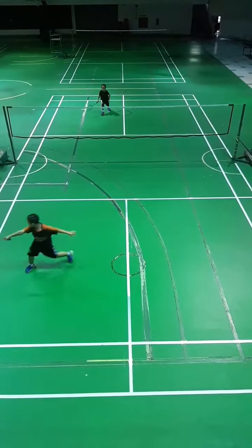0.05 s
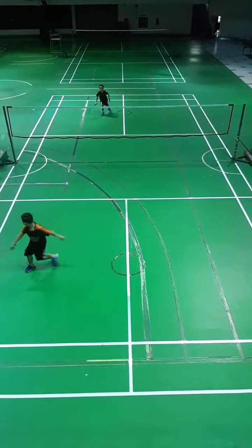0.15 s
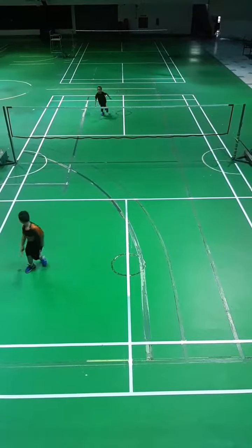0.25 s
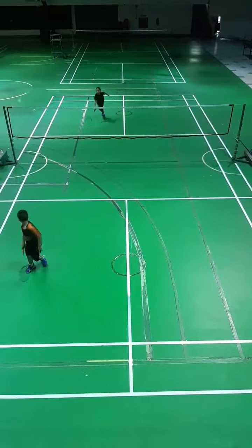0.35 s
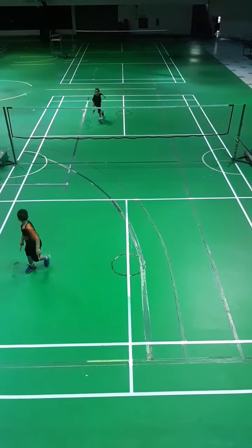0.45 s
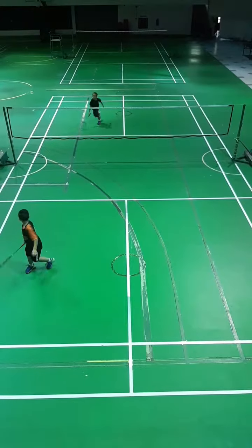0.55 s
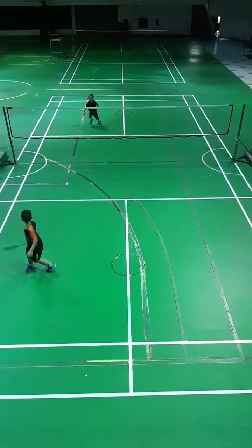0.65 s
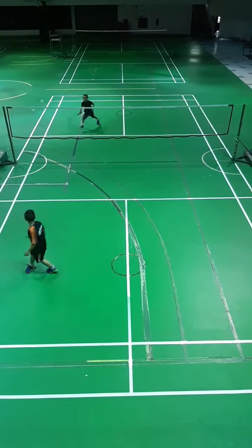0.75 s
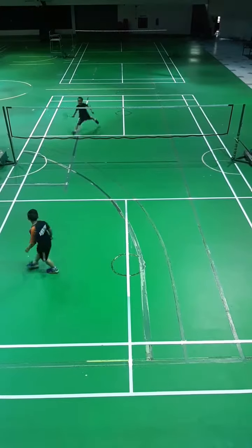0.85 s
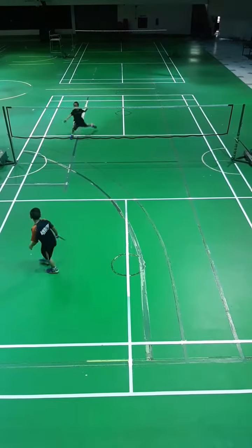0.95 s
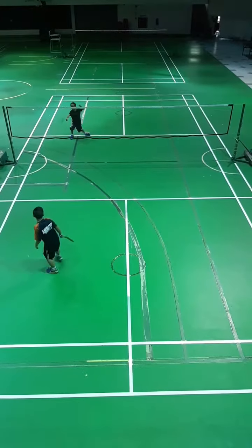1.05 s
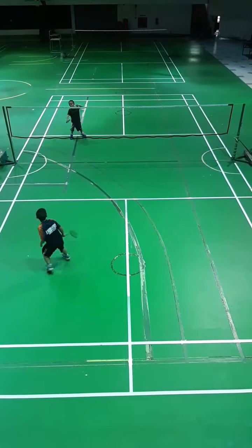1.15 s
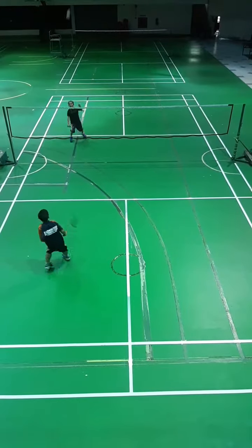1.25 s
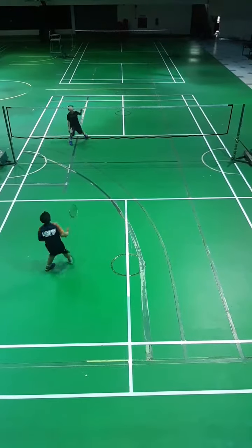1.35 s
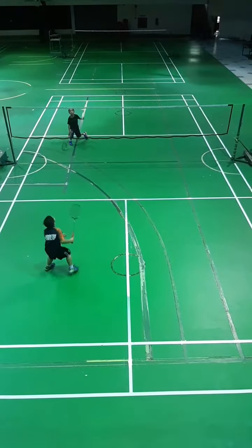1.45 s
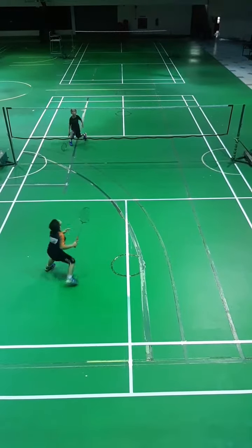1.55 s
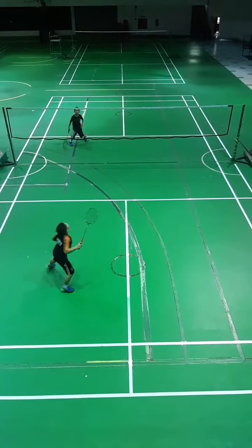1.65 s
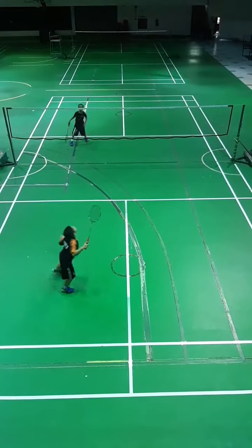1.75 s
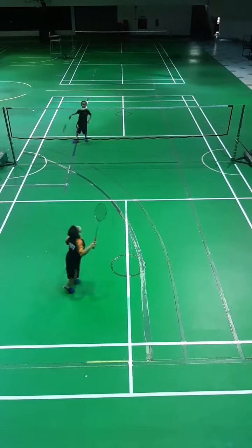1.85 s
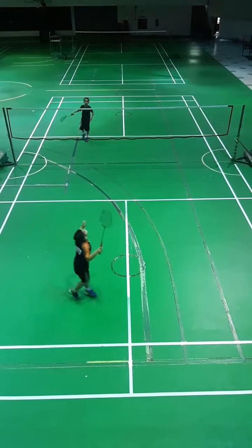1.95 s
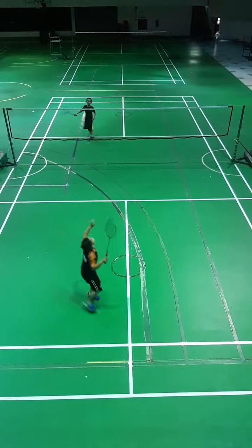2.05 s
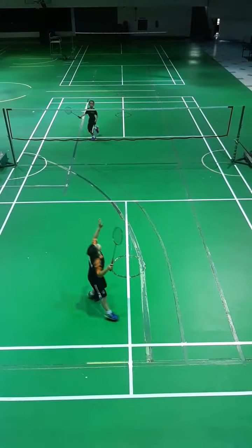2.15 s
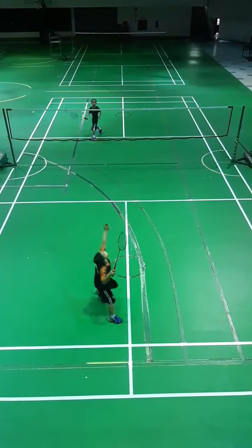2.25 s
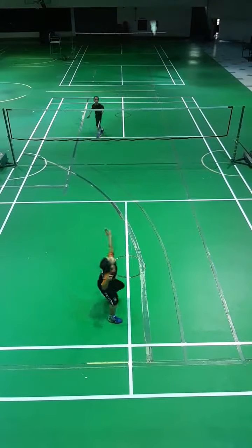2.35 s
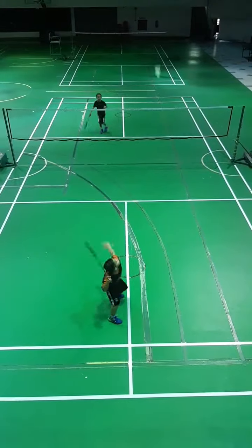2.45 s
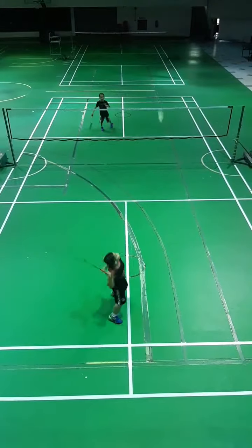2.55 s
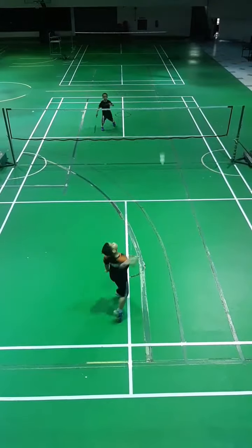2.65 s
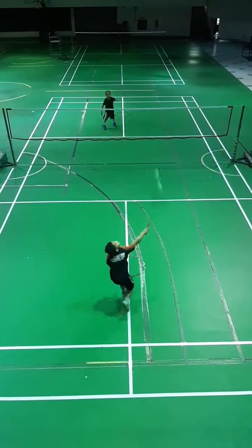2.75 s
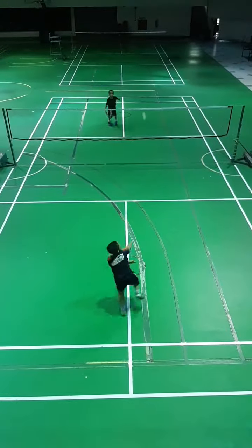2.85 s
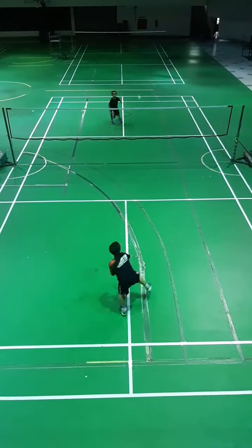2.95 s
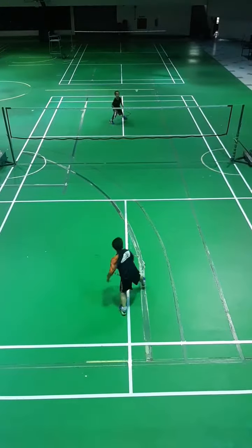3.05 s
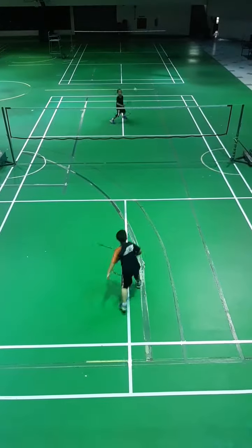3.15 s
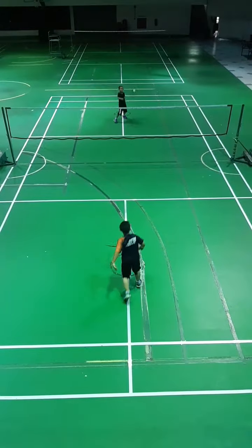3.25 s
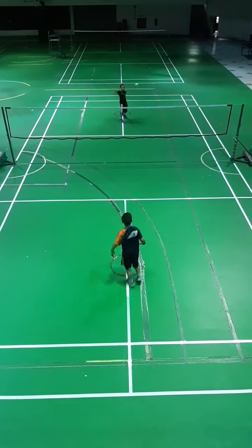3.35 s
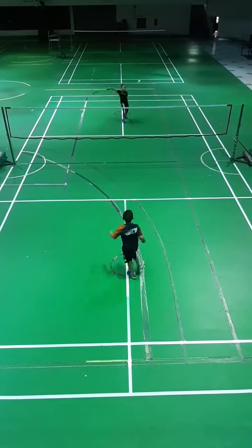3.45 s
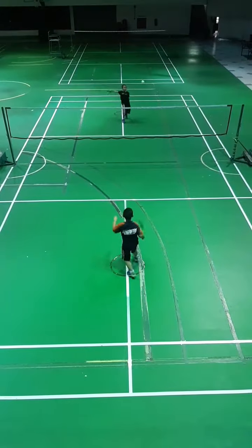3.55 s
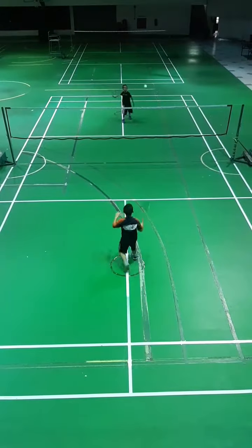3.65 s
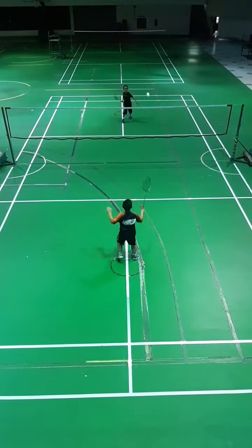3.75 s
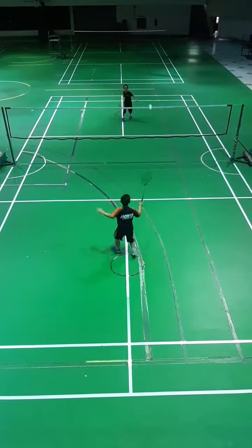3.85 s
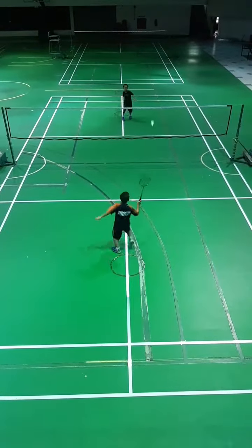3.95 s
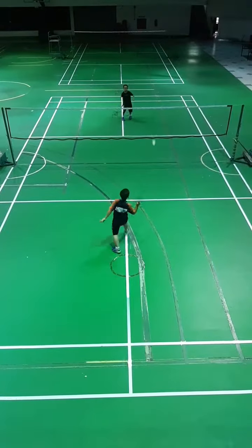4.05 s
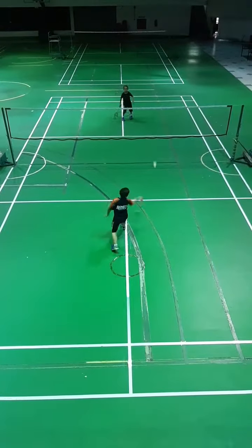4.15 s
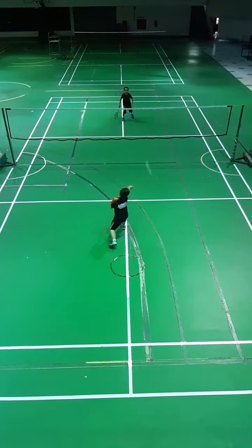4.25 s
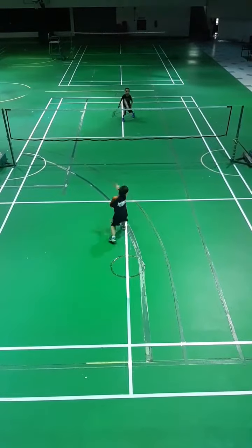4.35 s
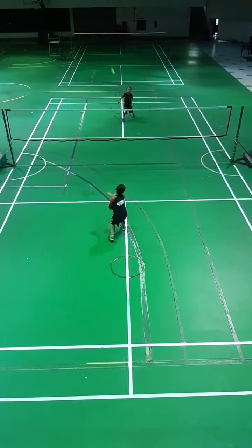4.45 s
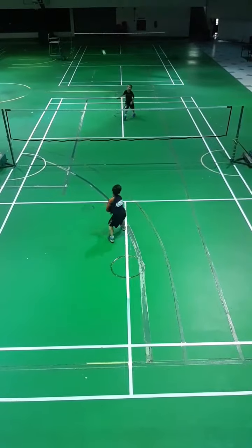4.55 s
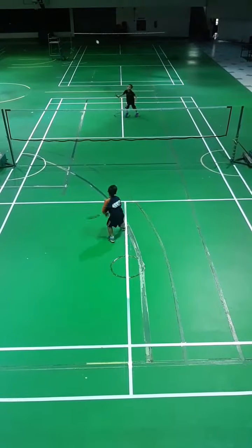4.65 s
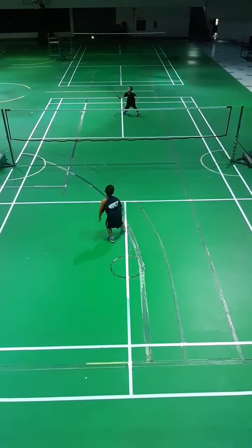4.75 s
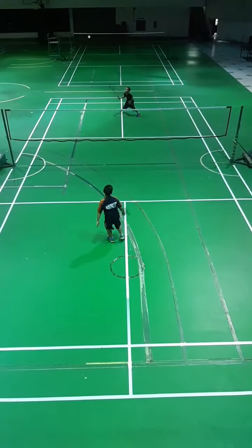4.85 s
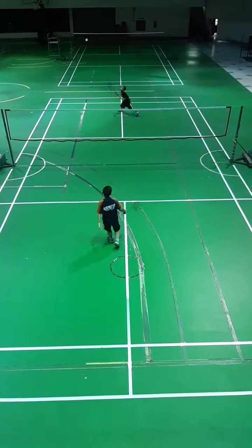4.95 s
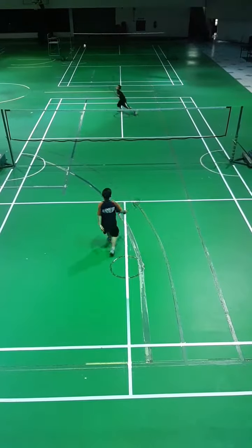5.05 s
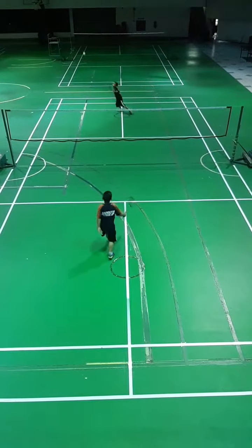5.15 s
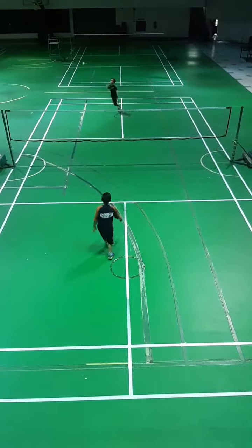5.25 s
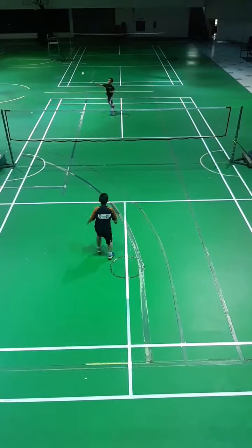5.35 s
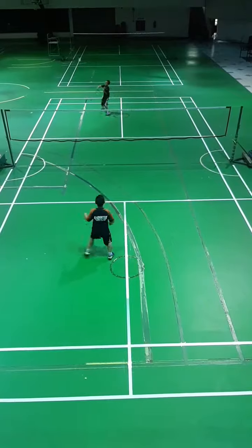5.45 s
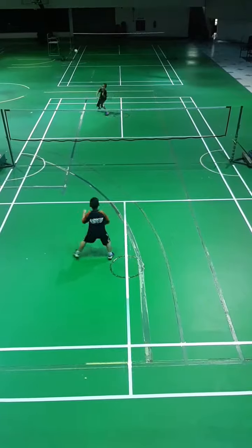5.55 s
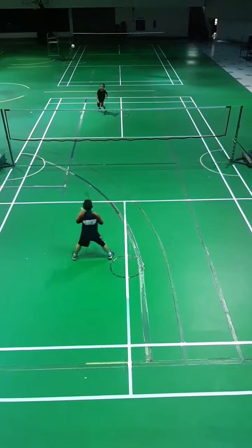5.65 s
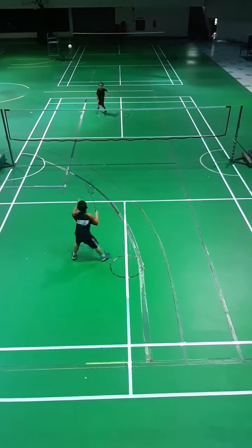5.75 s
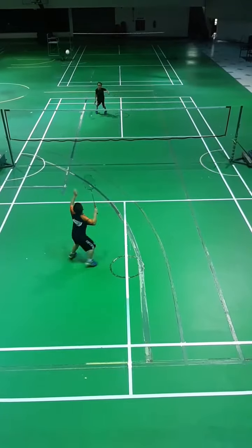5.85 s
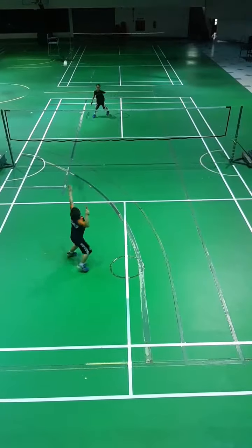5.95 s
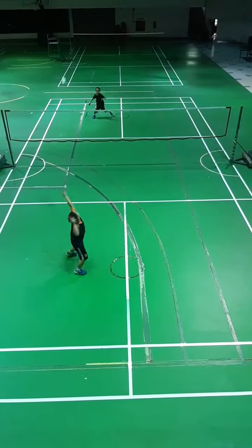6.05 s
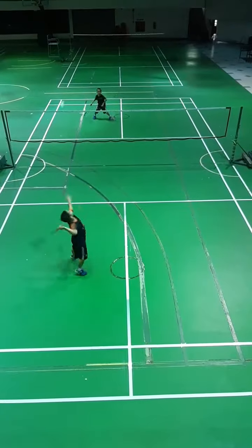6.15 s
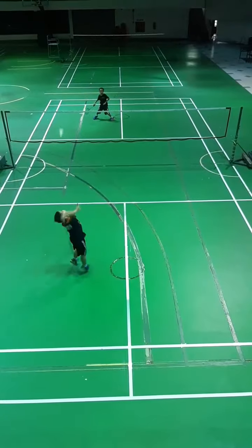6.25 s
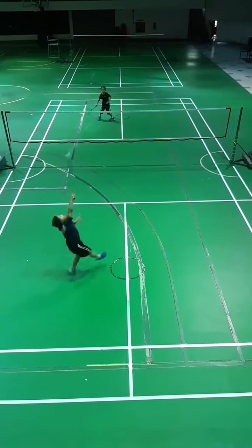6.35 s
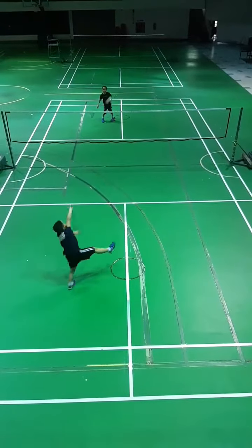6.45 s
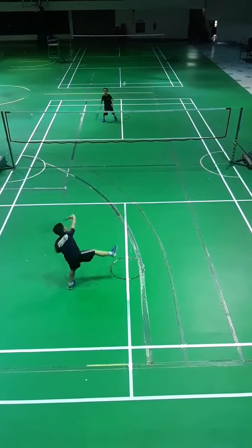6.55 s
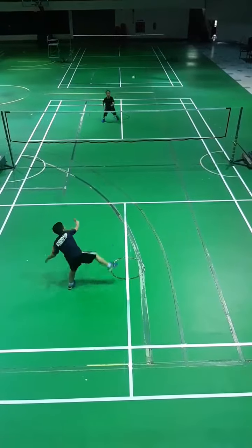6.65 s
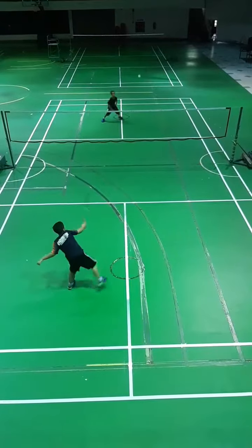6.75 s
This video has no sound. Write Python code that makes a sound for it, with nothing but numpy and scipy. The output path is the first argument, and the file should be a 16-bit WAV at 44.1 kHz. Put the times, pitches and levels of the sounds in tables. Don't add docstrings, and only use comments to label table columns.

```python
import sys
import numpy as np
from scipy import signal
from scipy.fft import rfft, irfft
from scipy.io import wavfile
from scipy.ndimage import uniform_filter1d

SR = 44100
rng = np.random.default_rng(int(sys.argv[2]) if len(sys.argv) > 2 else 0)


def file_out(sig):
    cols = np.atleast_2d(sig).T
    lim = np.clip(cols, -1, 1)
    pcm = np.round(lim * 32767).astype(np.int16)
    wavfile.write(sys.argv[1], SR, pcm)


def volts_from_db(level):
    exponent = np.asarray(level, float) / 20
    return 10 ** exponent


N = 300762
LEAD = SR // 4

# (frequency [Hz], level [dB per Hz])
SLAP_COLOUR = [(200, -24.5), (500, 0.5), (1200, -3), (1800, -5), (2700, -9.5), (4500, -4), (6800, -10.5),
               (8000, -17), (12000, -21.5), (15000, -32.5)]


def racket_hits():
    # (time [s], knock [dB], crack [dB], hall share [dB])
    near_hits = [
        (2.7656, -20.5, -9.5, -21.5),
        (6.3692, -23, -20, -17),
    ]
    # (delay [s], knock [dB], knock pitch [Hz], crack [dB], hall share [dB])
    paths = [
        (0, 0.5, 464, 1.5, -3.5),
        (.0077, -2, 700, 4.5, -10.5),
        (.018, -15.5, 813, -16, 9),
        (.047, -11, 1530, -14, -10),
        (.057, -15, 1515, -12, -7),
    ]
    # (time [s], knock [dB], knock pitch [Hz], crack [dB], hall share [dB])
    far_hits = [
        (0.187, -58, 300, -31.5, -30),
        (0.9798, -21, 1540, -31, -34),
        (0.9955, -18, 1840, -28.5, -21.5),
        (5.4098, -24, 520, -32, -17.5),
        (5.4113, -24.5, 1380, -24, -17),
        (5.413, -27.5, 2070, -30, -14),
    ]
    # (frequency [Hz], level [dB per Hz])
    crack = [(500, -30), (1500, -13), (2500, -16), (3700, -7), (5400, -8), (6500, 0), (7400, -8),
             (8500, -13), (10500, -25), (12500, -25), (15000, -40)]
    # (frequency [Hz], level [dB per Hz])
    crack_tail = [(120, -36.5), (300, -0.5), (700, -13), (1500, -4.5), (2600, -8), (3800, -6), (6600, -9),
                  (8000, -17.5), (14000, -21)]
    near = []
    for s, knock_db, crack_db, hall_db in near_hits:
        for late, path_knock_db, hz, path_crack_db, path_hall_db in paths:
            near.append((s + late, knock_db + path_knock_db, hz,
                         crack_db + path_crack_db, hall_db + path_hall_db))
    hits = sorted(split_hall_share(near + far_hits, extra_db=-2))
    return blows(hits, crack, crack_tail, cycles=0.51, burst_s=0.002, rattle_db=-19,
                 rise_s=0.0086, sparse_db=3.1)


def strings():
    # (time [s], heard pitch [Hz], direct [dB], side wall [dB], hall [dB])
    string_beds = [
        (-.05, 1060, -70, -80, -55),
        (0.949, 1108, -30.5, -70, -49),
        (.996, 1062, -36, -70, -50.5),
        (2.7676, 1013, -14.5, -34, -41),
        (4.264, 1112, -38, -73, -63),
        (5.416, 1135, -27.5, -60, -45.5),
        (6.372, 1010, -23, -29, -46.5),
    ]
    rest_hz, t60_s = 1082.4, 0.065
    rings = []
    for s, hz, db, side_db, hall_db in string_beds:
        rings.append((s, hz, db, t60_s, hall_db))
        rings.append((s + 0.047, rest_hz, side_db, 0.21, side_db - 15.5))
        rings.append((s + 0.094, 2 * rest_hz - hz, hall_db - 9, t60_s, hall_db - 1))
    direct, sent = empty_tracks()
    t = np.arange(8192) / SR
    for s, hz, db, decay_s, hall_db in rings:
        onset = 1 - np.exp(-t * hz / 2)
        ring = volts_from_db(-60 * t / decay_s) * onset * np.sin(2 * np.pi * hz * t)
        add(direct, s, volts_from_db(db) * ring)
        add(sent, s, volts_from_db(hall_db) * unit(ring))
    return in_hall(direct, sent, rise_s=0.0096, sparse_db=7.5)


def landings():
    # (time [s], thud [dB], thud pitch [Hz], slap [dB], hall share [dB])
    steps = [(-.12, -21.5, 313, -29.5, -13), (.0234, -14, 371, -22.5, -22.5),
             (.0236, -20.5, 920, -16, -33.5), (1.3215, -43.5, 199, -32.5, -14),
             (2.7655, -28.5, 200, -47, -24.5), (2.886, -27, 394, -22.5, -21.5),
             (3.3065, -29.5, 451, -33.5, -21.5), (4.1843, -22.5, 486, -29.5, -17.5),
             (4.1863, -22, 300, -44, -18), (4.2215, -34, 625, -31, -17.5), (4.268, -33.5, 390, -26, -20),
             (6.476, -39, 354, -34.5, -10.5)]
    # (time [s], thud [dB], slap [dB])
    wall_echoes = [
        (.062, -37, -26.5),
        (.081, -32.5, -31),
        (.114, -27.5, -58),
        (1.0365, -29.5, -31),
        (1.0719, -24.5, -30),
        (4.234, -30, -28.5),
        (4.2651, -38, -23),
    ]
    wall_thud_hz, thud_hall_db, slap_hall_db = 326, -17.5, -24
    echoes = [(s, thud_db, wall_thud_hz, slap_db, thud_hall_db, slap_hall_db)
              for s, thud_db, slap_db in wall_echoes]
    footfalls = sorted(split_hall_share(steps, extra_db=1.5) + echoes)
    return blows(footfalls, SLAP_COLOUR, SLAP_COLOUR, cycles=0.7, burst_s=0.0015, rattle_db=-7,
                 rise_s=0.026, sparse_db=5)


def far_landing():
    # (time [s], thud [dB], thud pitch [Hz], slap [dB], hall share [dB])
    far_steps = [
        (.9493, -19, 223, -18.5, -17),
        (.9495, -25.5, 980, -42, -19.5),
    ]
    return blows(split_hall_share(far_steps, extra_db=-0.3), SLAP_COLOUR, SLAP_COLOUR, cycles=0.38,
                 burst_s=0.0017, rattle_db=9, rise_s=0.015, sparse_db=5.7)


def light_steps():
    # (time [s], thud [dB], thud pitch [Hz], slap [dB])
    taps = [(0.921, -44, 181, -59), (1.432, -54, 1200, -32.5), (1.48, -56, 1200, -40),
            (2.0975, -47.5, 945, -59), (2.219, -38.5, 404, -33), (2.26, -48, 398, -47),
            (2.274, -44.5, 1530, -45), (3.602, -44, 1300, -40.5), (3.622, -43, 350, -51),
            (3.836, -47, 400, -42), (3.864, -44, 1300, -41.5), (4.155, -54, 300, -49),
            (6.2158, -50, 219, -51)]
    # (frequency [Hz], level [dB per Hz])
    scuff = [(300, -30), (1300, 0.5), (2600, -12.5), (4200, -6), (6500, 0.5), (8000, -12), (12000, -20),
             (15000, -40)]
    thud_hall_db, slap_hall_db = -18.5, -26.5
    rows = [(*tap, thud_hall_db, slap_hall_db) for tap in taps]
    return blows(rows, scuff, scuff, cycles=0.65, burst_s=0.0023, rattle_db=-12,
                 rise_s=0.0088, sparse_db=7)


def blows(table, colour, tail_colour, cycles, burst_s, rattle_db, rise_s, sparse_db):
    direct, silent = empty_tracks()
    sent = np.zeros((3, len(direct)))
    t = np.arange(2048) / SR
    rattle_decay = np.exp(-t / burst_s) + 0.22 * np.exp(-t / 0.005)
    direct_click, hall_click = click(colour)[:256], click(tail_colour)
    for k, (s, body_db, hz, burst_db, body_hall_db, burst_hall_db) in enumerate(table):
        push = t * hz * np.exp(-t * hz / cycles)
        body = -push * np.cos(2 * np.pi * hz * t * (1 - 0.069 * np.minimum(t * hz, 2)))
        body = body - push * body.sum() / push.sum()
        contact = (t == 0) + volts_from_db(rattle_db) * rng.standard_normal(len(t)) * rattle_decay
        burst = np.convolve(contact, direct_click)
        add(direct, s, volts_from_db(body_db) * body / np.abs(body).max())
        add(direct, s, volts_from_db(burst_db) * burst / np.abs(burst).max())
        path = sent[k % len(sent)]
        add(path, s, volts_from_db(body_db + body_hall_db) * unit(body))
        add(path, s, volts_from_db(burst_db + burst_hall_db) * hall_click)
    return direct[LEAD:] + sum(in_hall(silent, path, rise_s, sparse_db) for path in sent)


def split_hall_share(table, extra_db):
    return [(*row, row[-1] + extra_db) for row in table]


def click(points):
    pulse = np.eye(1, 2048)[0]
    cepstrum = irfft(np.log(np.abs(rfft(shaped(pulse, points)))))
    half = len(cepstrum) // 2
    fold = np.r_[1, np.full(half - 1, 2), 1, np.zeros(half - 1)]
    return unit(irfft(np.exp(rfft(cepstrum * fold))))


def sole_squeaks():
    # (time [s], length [s], pitch [Hz], level [dB], overtones [dB])
    chatter = [(.065, 0.011, 5240, -38.5, -12), (1.358, 0.016, 3680, -39.5, -6),
               (1.36, 0.021, 4196, -36, -10.5), (1.386, 0.021, 3800, -40.5, -9),
               (1.412, .011, 3973, -38, 4), (1.433, 0.0071, 4090, -52, 8), (5.504, .019, 4850, -45.5, -5),
               (5.52, 0.021, 4535, -35.5, 0), (5.542, 0.004, 4480, -27, -13),
               (5.546, 0.041, 4900, -37, -11), (6.011, .018, 4384, -38, -12), (6.012, 0.004, 5750, -45, -8),
               (6.041, 0.039, 4310, -45, -8.5), (6.066, 0.021, 4200, -50.5, -6),
               (6.215, 0.0079, 4180, -58, -16)]
    sag = 0.0446
    rows = [(s, length, hz, hz * (1 - sag), db, over_db) for s, length, hz, db, over_db in chatter]
    return stick_slip(rows, waver=0.2, hall_db=-32.5, over_hall_db=-6)


def sole_squeals():
    # (time [s], length [s], first pitch [Hz], last pitch [Hz], level [dB])
    slides = [
        (2.555, 0.026, 4797, 4726, -41.5),
        (2.596, 0.031, 4760, 4704, -43),
        (2.66, 0.048, 4720, 4970, -41),
        (3.679, .005, 6750, 6750, -52),
        (3.693, 0.024, 5770, 6250, -60.5),
        (4.716, 0.022, 5950, 5530, -54),
        (4.738, 0.033, 5590, 5340, -49),
    ]
    overtones_db = -22
    rows = [(*slide, overtones_db) for slide in slides]
    return stick_slip(rows, waver=0.1, hall_db=-30, over_hall_db=-3)


def stick_slip(table, waver, hall_db, over_hall_db):
    direct, sent = empty_tracks()
    wander = uniform_filter1d(rng.standard_normal((len(table), 4096)), 40)
    for (s, length, first_hz, last_hz, db, over_db), drift in zip(table, wander):
        u = np.arange(int(length * SR)) / (length * SR)
        hz = (first_hz + (last_hz - first_hz) * u) * (1 + waver * drift[:len(u)])
        phase = 2 * np.pi * np.cumsum(hz) / SR
        swell = volts_from_db(db) * np.sin(np.pi * u)
        base = np.sin(phase)
        over = volts_from_db(over_db) * (np.sin(2 * phase) + volts_from_db(-7.5) * np.sin(3 * phase))
        add(direct, s, swell * (base + over))
        add(sent, s, volts_from_db(hall_db) * swell * (base + volts_from_db(over_hall_db) * over))
    return in_hall(direct, sent, rise_s=0.014, sparse_db=3)


def sole_brushes():
    # (time [s], length [s], pitch [Hz], width [share of pitch], level [dB])
    brushes = [
        (1.991, 0.037, 6480, 0.35, -63),
        (2.133, 0.033, 1026, .11, -62.5),
        (3.006, 0.03, 1170, 0.088, -52),
        (5.986, 0.035, 5700, 0.43, -58),
    ]
    sag = 0.053
    return swept_noise([(s, length, hz, hz * (1 - sag), share, db)
                        for s, length, hz, share, db in brushes])


def racket_swings():
    # (start [s], length [s], level [dB])
    swings = [
        (2.698, 0.11, -48),
        (5.359, .069, -58),
        (6.31, 0.056, -58.5),
    ]
    whoosh = [(s, length, 311.5, 1039, 0.28, db) for s, length, db in swings]
    hiss = [(s, length, 5300, 9640, 0.24, db - 14) for s, length, db in swings]
    return swept_noise(whoosh + hiss)


def swept_noise(table):
    direct, _ = empty_tracks()
    for s, length, first_hz, last_hz, share, db in table:
        u = np.arange(int(length * SR)) / (length * SR)
        phase = 2 * np.pi * np.cumsum(first_hz * (last_hz / first_hz) ** u) / SR
        pole = np.exp(-1.5 * np.pi * share * last_hz / SR)
        slow = signal.lfilter([1], np.poly([pole, pole]), rng.standard_normal((2, 8192)))
        a, b = slow[:, -len(u):]
        band = (a * np.cos(phase) + b * np.sin(phase)) * np.sqrt(u) * (1 - u ** 6)
        add(direct, s, volts_from_db(db) * unit(band) * np.sqrt(len(u)))
    return in_hall(direct, volts_from_db(-42) * direct, rise_s=0.0067, sparse_db=2.9)


def board_rumble():
    # (time of peak [s], level [dB])
    peaks = [
        (0.01, -45),
        (1.3, -57),
        (1.769, -63.5),
        (2.94, -57.5),
        (3.61, -59.5),
        (4.33, -60),
        (5.3, -55),
        (6.421, -49.5),
    ]
    rise_db_s, fall_db_s, rest_db = 50, 28.5, -70.5
    t = np.arange(N) / SR
    shaking = volts_from_db(rest_db)
    for s, db in peaks:
        shaking = shaking + volts_from_db(db - np.maximum(rise_db_s * (s - t), fall_db_s * (t - s)))
    # (frequency [Hz], level [dB per Hz])
    colour = [(50, -38.5), (90, 5), (118, 5.5), (150, 13.5), (250, -44.5)]
    return steady_noise(colour) * shaking * volts_from_db(-0.5)


def ventilation_hum():
    # (frequency [Hz], level [dB per Hz])
    hum_colour = [(12, -60), (20, -14.5), (96, 5), (221, 3), (383, -0.5), (612, -15), (1700, -24.5),
                  (1950, -33), (2950, -39), (3780, -24), (4710, -24.5), (6390, -24), (7750, -39.5),
                  (13400, -36.5), (14600, -17.5)]
    return steady_noise(hum_colour) * volts_from_db(-51)


def steady_noise(colour):
    return unit(shaped(rng.standard_normal(N), colour)) * np.sqrt(N)


def in_hall(direct, sent, rise_s, sparse_db):
    # (frequency [Hz], time to fall by 60 dB [s])
    hall_decay = [(60, 2.9), (250, 1.4), (600, 1.63), (900, 1.62), (1120, 2.12), (1350, 1.57),
                  (2000, 1.563), (4000, 1.41), (6000, 1.1), (9000, 1.05), (14000, 0.5)]
    patchy_db, patchy_s = 3.5, 0.3
    size = 2 ** 16
    t = np.arange(size) / SR
    strength = np.minimum(rng.exponential(size=size // 64), 3).repeat(64) - 0.5
    echoes = rng.standard_normal(size) * volts_from_db(sparse_db * np.exp(-t / 0.048) * strength)
    f, frames, z = signal.stft(echoes, SR, nperseg=512)
    hz, decay_s = np.transpose(hall_decay)
    t60 = np.interp(np.log(f + 1), np.log(hz), decay_s)
    patches = uniform_filter1d(rng.standard_normal(z.shape), size=4, axis=0)
    patches = uniform_filter1d(patches, size=4, axis=1) * 4.3
    z = z * volts_from_db(patchy_db * np.exp(-frames / patchy_s) * patches)
    tail = signal.istft(z * volts_from_db(-60 * frames / t60[:, None]), SR, nperseg=512)[1][:size]
    tail = tail * (1 - np.exp(-t / rise_s)) ** 2
    return (direct + signal.fftconvolve(sent, tail)[:len(sent)])[LEAD:]


def shaped(x, points):
    hz, db = np.transpose(points)
    f = np.fft.rfftfreq(len(x), 1 / SR)
    gain_db = np.interp(np.log(f + 1), np.log(hz), db)
    return irfft(rfft(x) * volts_from_db(gain_db), len(x))


def unit(x):
    return x / np.sqrt(np.sum(x ** 2))


def empty_tracks():
    return np.zeros((2, N + LEAD))


def add(track, s, x):
    i = int((s + 1 / 4) * SR)
    track[i:i + len(x)] += x[:len(track) - i]


def scene():
    rackets = racket_hits() + strings() + racket_swings()
    feet = landings() + far_landing() + light_steps()
    soles = sole_squeaks() + sole_squeals() + sole_brushes()
    background = board_rumble() + ventilation_hum()
    return (rackets + feet + soles + background)[None]


def top_cut(x):
    return signal.sosfilt(signal.butter(12, 14760, fs=SR, output="sos"), x)


def record(dry):
    low_hz, top_hz, start_s = 93, 13900, 0.0135
    x = signal.sosfilt(signal.butter(2, low_hz, "high", fs=SR, output="sos"), dry)
    x = signal.sosfilt(signal.ellip(10, 0.2, 70, top_hz, fs=SR, output="sos"), x)
    opening = np.clip((np.arange(N) / SR / start_s) ** 10, 0.12, 1)
    return top_cut(x * opening)


dry = scene()
out = record(dry)
file_out(out)
```